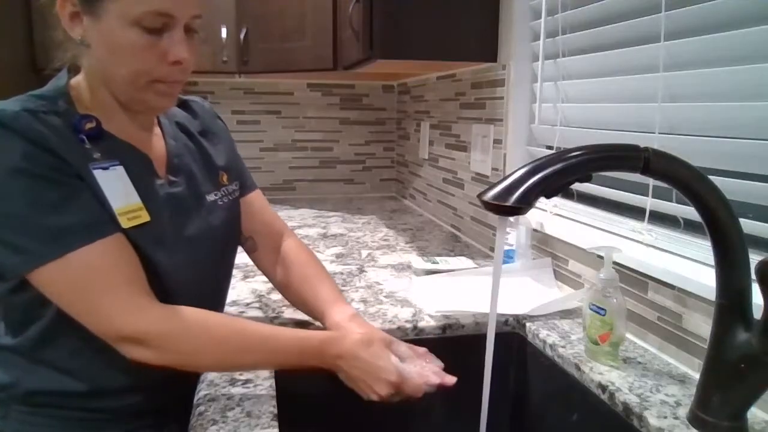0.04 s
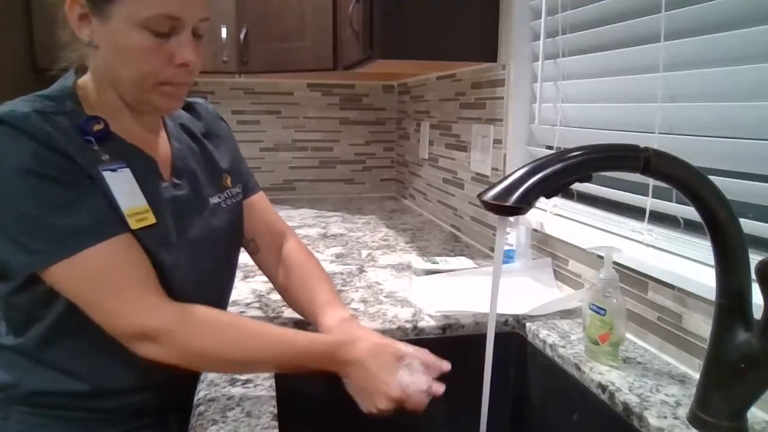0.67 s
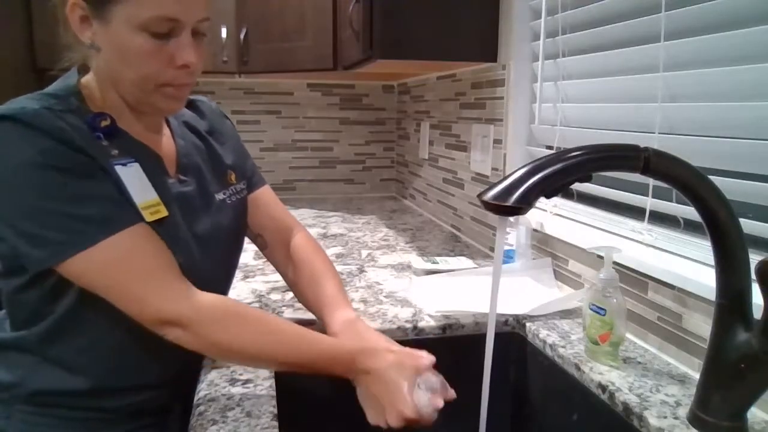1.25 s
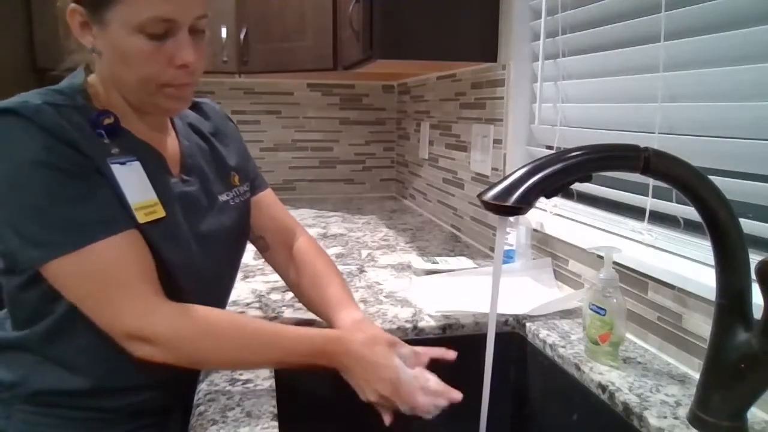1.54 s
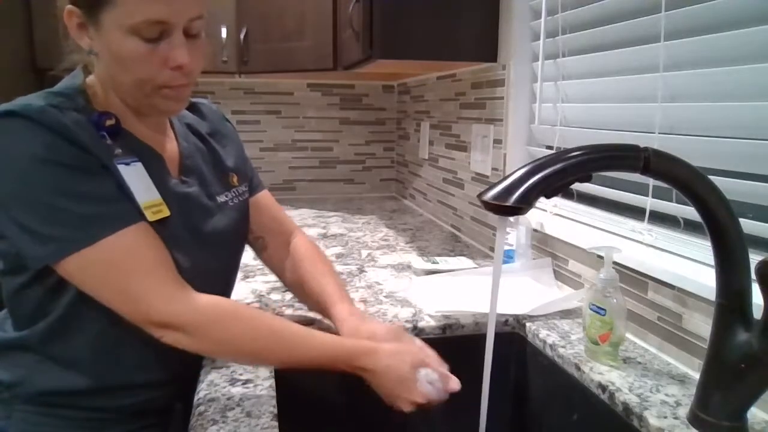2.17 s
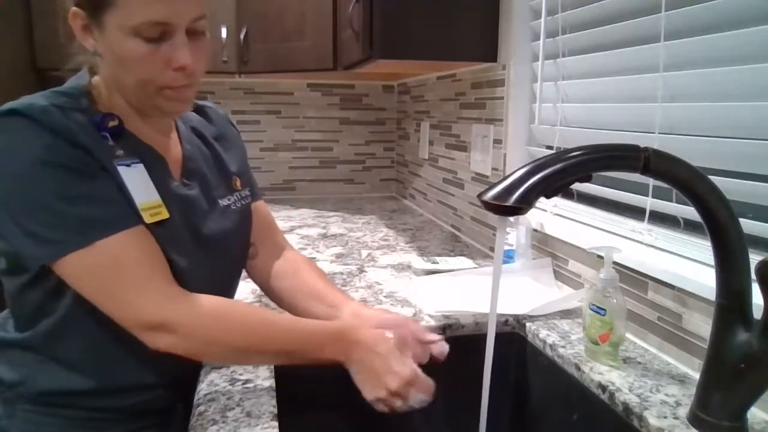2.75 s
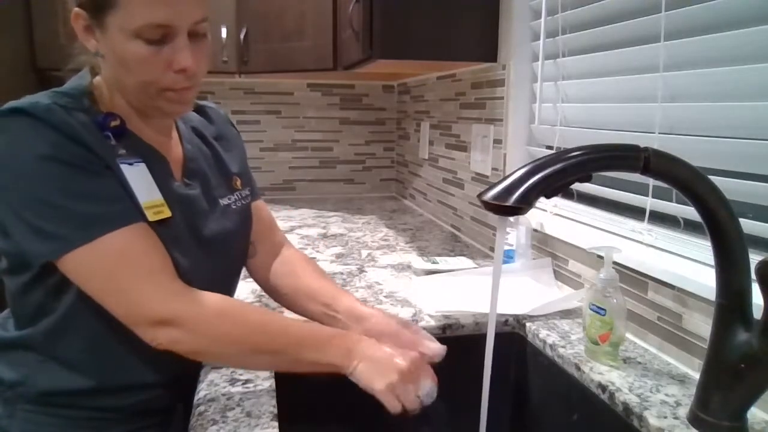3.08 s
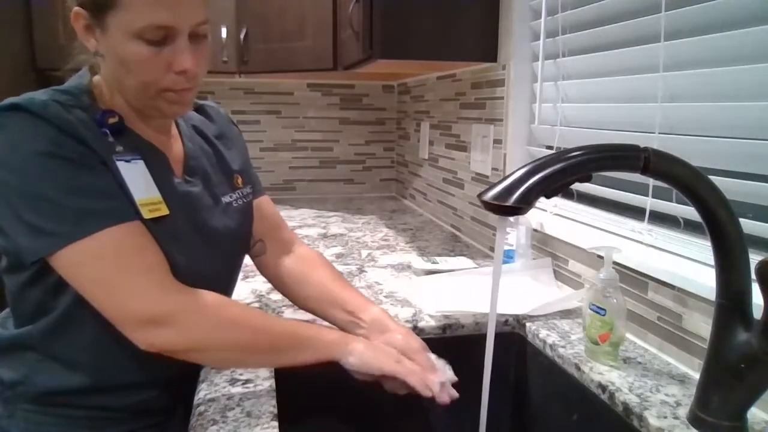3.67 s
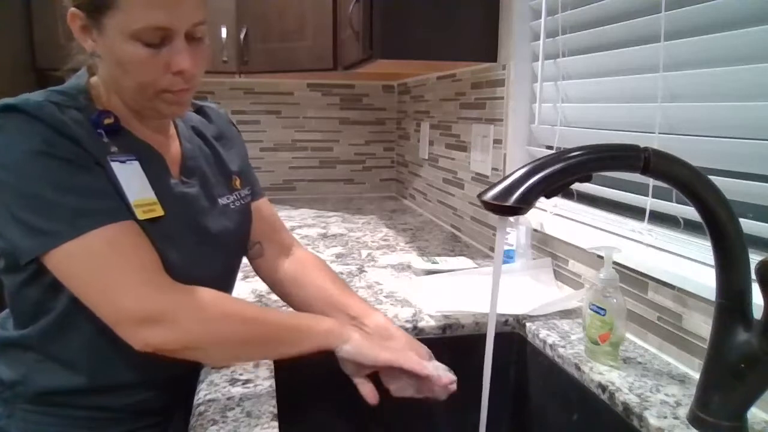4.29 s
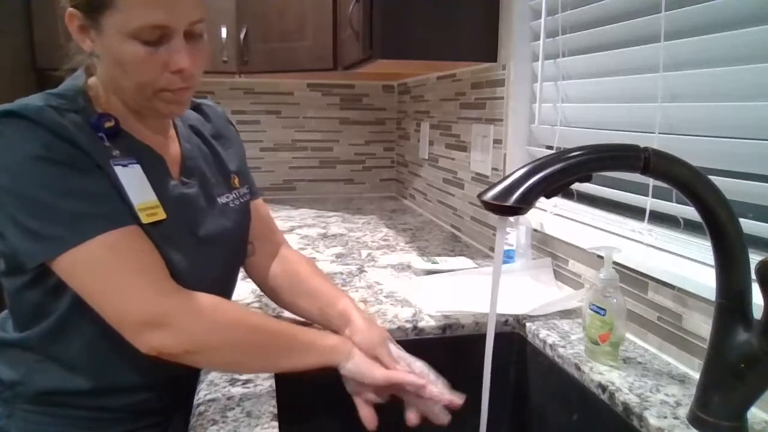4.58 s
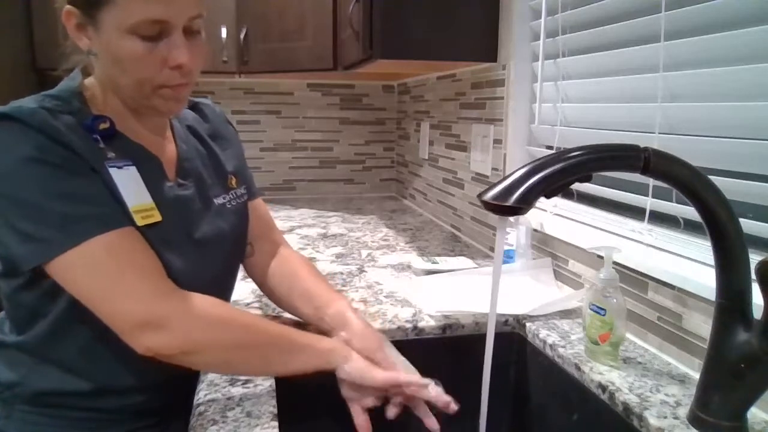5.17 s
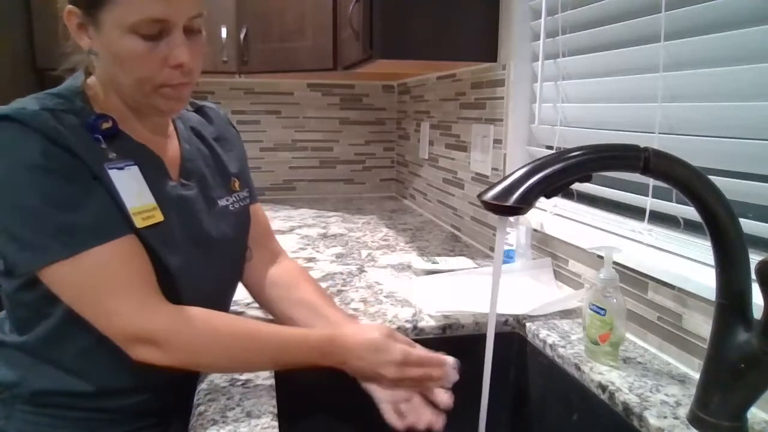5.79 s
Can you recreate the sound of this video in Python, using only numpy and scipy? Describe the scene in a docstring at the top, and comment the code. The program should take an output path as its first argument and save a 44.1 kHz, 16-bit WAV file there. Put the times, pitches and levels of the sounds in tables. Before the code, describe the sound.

From the first moment, soapy hands rub together close by, making a continuous, bright crackle of bursting foam. Short wet squelches come irregularly, several a second, mixed with sharp snaps of soap film, small pops and tiny high squeaks of trapped air. Crisp snaps stand out at the start and near 0.8 seconds. The squishing is busiest from about 2 to 3 seconds, with the strongest pop and snap around 2.6. Softer slippery slides follow just after 3 seconds, then another snap near 4, a cluster of squelches and pops around 4.5 to 4.8, and a last pop near 5.9. Underneath, for all six seconds and much quieter, a thin stream from a faucet patters into the sink, with soft low drumming on the basin and faint gurgles at the drain. The hard kitchen corner adds a brief ring and a short echo.

```python
"""Soapy hands rub together over a kitchen sink while a thin stream runs from the faucet.
Tiny foam bubbles burst and crackle, air pockets squelch, squeak and pop between the palms,
and soap films snap. The stream drums softly on the basin and gurgles at the drain.
The hands and the spray ring briefly in the hard corner of counter and tiles. The sound is mono."""
import sys
import numpy as np
from scipy import signal
from scipy.fft import rfft, irfft, next_fast_len
from scipy.io import wavfile
from scipy.ndimage import uniform_filter1d, map_coordinates

SR = 44100
rng = np.random.default_rng(int(sys.argv[2]) if len(sys.argv) > 2 else 0)


def unload_audio(sound):
    """Save the sound as a 16-bit wav file, at the path given as the first command line argument."""
    columns = np.transpose(np.atleast_2d(sound))
    # keep every value between -1 and 1, then stretch to whole-number steps
    steps = np.round(np.clip(columns, -1, 1) * 32767)
    wavfile.write(sys.argv[1], SR, steps.astype(np.int16))


N = 266319

# Levels in a table compare its rows; the function that plays them sets the final loudness.
# big air pockets squeezed out between the hands: start_s, length_s, level_db, pitch_hz, spread_octaves
AIR_POCKETS = [(0.012, 0.046, -43, 4501, 0.327), (0.305, 0.07674, -47, 4617, 0.4145),
               (0.38, 0.046, -43.5, 6499, 0.1481), (0.486, 0.03, -43, 6921, 0.052),
               (0.551, 0.06023, -46, 4670, 0.56285), (0.632, 0.04, -44, 7042, 0.1807),
               (0.727, 0.026, -40.5, 4823, 0.3767), (0.818, 0.01584, -31.5, 5959, 0.21166),
               (1.018, 0.02294, -45, 6095, 0.0439), (1.136, 0.03133, -44, 4551, 0.66),
               (1.232, 0.0405, -46.5, 3508, 0.3505), (1.299, 0.04623, -43.5, 3939, 0.2183),
               (1.397, 0.03402, -43.5, 4895, 0.57), (1.493, 0.02426, -37.5, 4861, 0.039),
               (1.614, 0.01157, -35.5, 7417, 0.045), (1.68, 0.034, -39, 5529, 0.2503),
               (1.719, 0.03098, -41, 4652, 0.4156), (1.807, 0.04213, -41, 6689, 0.2499),
               (1.842, 0.026695, -35, 4807, 0.4923), (1.933, 0.039, -44.5, 3812, 0.2182),
               (2.002, 0.02113, -43, 7164, 0.0789), (2.048, 0.014, -32.5, 4407, 0.1054),
               (2.121, 0.0285, -36.5, 6095, 0.1908), (2.371, 0.06287, -41, 5404, 0.31853),
               (2.454, 0.11953, -42, 4686, 0.1214), (2.51, 0.04525, -33, 4393, 0.3221),
               (2.572, 0.05582, -38.5, 5469, 0.533), (2.653, 0.02888, -34.5, 8039, 0.1037),
               (2.681, 0.03801, -44.5, 4274, 0.2152), (2.814, 0.026, -45.5, 4561, 0.386),
               (2.87, 0.0592, -41.5, 4151, 0.256), (2.995, 0.021, -39.5, 5582, 0.7),
               (3.105, 0.02269, -37, 7068, 0.1974), (3.245, 0.03818, -37.5, 6695, 0.65),
               (3.309, 0.0499, -42, 6353, 0.3632), (3.584, 0.03816, -42, 5285, 0.1685),
               (3.477, 0.04128, -51, 3233, 0.2561), (3.638, 0.0942, -44.5, 4985, 0.59),
               (3.897, 0.06506, -48.5, 3604, 0.3284), (3.954, 0.04677, -41, 4869, 0.46),
               (4.203, 0.03, -43.5, 3864, 0.31006), (4.237, 0.033, -36.5, 5210, 0.3756),
               (4.277, 0.02, -36.5, 6060, 0.2037), (4.378, 0.07, -49.5, 5270, 0.043),
               (4.427, 0.04529, -38.5, 5986, 0.3971), (4.547, 0.03946, -40, 6113, 0.3225),
               (4.602, 0.05, -38, 4425, 0.2061), (4.692, 0.0871, -39, 4706, 0.2201),
               (4.752, 0.02261, -34.5, 4291, 0.71), (4.815, 0.03528, -45.5, 4720, 0.1655),
               (4.857, 0.01606, -42.5, 4086, 0.3776), (4.932, 0.04562, -42, 4271, 0.5653),
               (5.027, 0.0667, -39, 5444, 0.074), (5.125, 0.01755, -41.5, 4708, 0.332),
               (5.17, 0.03136, -44.5, 5235, 0.102), (5.238, 0.02914, -37.5, 4323, 0.6234),
               (5.309, 0.027, -35.5, 6067, 0.25), (5.499, 0.04478, -37, 6341, 0.3826),
               (5.566, 0.01889, -43.5, 4560, 0.5624), (5.727, 0.027, -39, 5137, 0.1583),
               (5.831, 0.049, -38.5, 4655, 0.69), (5.904, 0.03634, -39, 3949, 0.5251)]
# soap films that snap: start_s, level_db
FILM_SNAPS = [(0.047, -19.5), (0.0653, -21.5), (0.087, -37), (.126, -27.5), (0.192, -24.5), (0.316, -24),
              (0.502, -24.5), (0.6571, -23), (0.8065, -24.5), (0.842, -16), (1.6208, -28.5),
              (2.0893, -22.5), (2.123, -19.5), (2.175, -22), (2.2314, -18.5), (2.587, -13), (2.6617, -22),
              (2.676, -24), (2.7493, -22), (2.7957, -26.5), (2.804, -27.5), (2.909, -20.5), (2.9983, -24),
              (3.246, -24.5), (3.5894, -23), (3.6929, -23), (3.9607, -16.5), (3.976, -22), (4.058, -29),
              (4.2763, -24.5), (4.4565, -21.5), (4.5628, -20.5), (4.7506, -20), (4.8652, -23), (5.24, -26),
              (5.336, -27.5), (5.417, -23.5), (5.526, -26), (5.696, -28)]
# tone of the foam and the spray, from low to high: frequency_hz, level_db
FOAM_TONE = [(150, -45), (700, -41.5), (1500, -16.5), (2300, -11.5), (3300, -18), (5000, -8), (6600, -5.5),
             (7700, -4), (9300, 0.5), (11500, 1.5), (14000, 3.5), (16000, -1.5)]


def amp(db):
    """Turn decibels into a number to multiply a sound by."""
    return 10 ** (np.asarray(db) / 20)


def unit(x):
    """Scale a sound to an average power of 1."""
    return x / np.sqrt(np.mean(x ** 2) + 1e-20)


def along(points, hz):
    """Read between (frequency_hz, value) points, giving each octave equal room."""
    frequencies, values = np.transpose(points)
    return np.interp(np.log(hz + 1), np.log(frequencies + 1), values)


def curve(rows):
    """Join (time_s, value) points with straight lines, one value per sample."""
    times, values = np.transpose(rows)
    return np.interp(np.arange(N) / SR, times, values)


def wobble(per_s):
    """A smooth random curve through per_s points a second."""
    return map_coordinates(rng.standard_normal(1024), [np.arange(N) * per_s / SR], mode='wrap')


def progress(n, length_s):
    """Climb from 0 to 1 in length_s, then stay there."""
    return np.minimum(np.arange(n) / (abs(length_s) * SR), 1)


def add(track, start_s, sound):
    """Mix a sound into the track."""
    start = int(np.clip(round(start_s * SR), 0, N - 1))
    track[start:start + len(sound)] += sound[:N - start]


def filtered(x, response):
    """Multiply each frequency in x by response(frequency)."""
    n = x.shape[-1]
    padded = next_fast_len(n + 4096)
    return irfft(rfft(x, padded) * response(np.fft.rfftfreq(padded, 1 / SR)), padded)[..., :n]


def coloured(x, tone):
    """Shape x with a (frequency_hz, level_db) table, at power 1."""
    return unit(filtered(x, lambda hz: amp(along(tone, hz))))


def low_cut(hz):
    """A filter response: small air pockets give off almost no low sound."""
    return (1 + (2200 / (hz + 1)) ** 8) ** -.5


def resonance(hz, pitch_hz, width_hz):
    """The response of something that rings at one pitch; narrower rings longer."""
    return 1j * hz * width_hz / (pitch_hz ** 2 - hz ** 2 + 1j * hz * width_hz)


def ringing(x, notes):
    """Let x ring several (pitch_hz, width_hz, level_db) notes at once."""
    return filtered(x, lambda f: sum(amp(db) * resonance(f, hz, width) for hz, width, db in notes))


def cavity(x, pitch_hz, width_hz):
    """Let x ring a small hollow whose pitch moves."""
    spin = np.exp(2j * np.pi * np.cumsum(pitch_hz) / SR)
    ring = signal.lfilter([1], [1, -np.exp(-np.pi * width_hz / SR)], x / spin)
    return unit((spin * ring).real)


def crackle(n, per_s, scatter_db, fade_s):
    """Tiny bursts of noise, random in timing and size."""
    hits = rng.random(n) < per_s / SR
    sizes = amp(scatter_db * np.clip(rng.standard_normal(n), -2, 2))
    power = signal.lfilter([1], [1, -np.exp(-2 / (fade_s * SR))], hits * sizes ** 2)
    return unit(np.sqrt(power + 1e-4) * rng.standard_normal(n))


def bubbles(n, per_s, pitch_hz, octaves, cycles, scatter_db):
    """Bubbles scattered around a pitch; each fades over its cycles and rises a little as it closes."""
    count = max(int(per_s * n / SR), 3)
    starts = ((np.arange(count) + rng.random(count)) * n / count).astype(int)
    detune, size = np.clip(rng.standard_normal((2, count, 1)), -2, 2)
    hz = np.minimum(np.broadcast_to(pitch_hz, n)[starts, None] * 2 ** (octaves * detune), SR / 2.8)
    samples = np.arange(min(int(5 * cycles * SR / np.mean(pitch_hz)) + 8, 6000))
    age = hz * samples / SR / cycles
    phase = 2 * np.pi * cycles * age * (1 + 0.003668 * age)
    rings = amp(scatter_db * size) * np.exp(-age) * np.sin(phase)
    return unit(np.bincount((starts[:, None] + samples).ravel(), rings.ravel(), n)[:n])


def stroke(length_s, rise_s, fade_s):
    """The loudness shape of one short sound: it rises, holds and fades."""
    t = np.arange(int((abs(length_s) + .05) * SR)) / SR
    shape = (1 - np.exp(-t / rise_s)) * np.exp(-np.maximum(t - 0.82652 * length_s, 0) / fade_s)
    return shape / np.sqrt(np.sum(shape ** 2) / (abs(length_s) * SR))


def swells(rows, rise_s, fade_s):
    """Power over time, with one rise, hold and fade for each row."""
    power, t = np.zeros(N), np.arange(SR // 2) / SR
    for start_s, length_s, level_db in rows:
        shape = (1 - np.exp(-t / rise_s)) * np.exp(-np.maximum(t - length_s, 0) / fade_s)
        add(power, start_s, (amp(level_db) * shape) ** 2)
    return power


def bubble_runs(rows, per_s, octaves, cycles):
    """For each row, a short run of bubbles near one pitch."""
    out = np.zeros(N)
    for start_s, length_s, level_db, pitch_hz in rows:
        swell = stroke(length_s, rise_s=.004, fade_s=.012)
        rings = bubbles(len(swell), per_s, pitch_hz, octaves, cycles, scatter_db=-2.5)
        add(out, start_s, amp(level_db) * swell * rings)
    return out


def foam_loudness():
    """Rubbing bursts foam all the time; big squeezes and snaps each burst some more."""
    # how hard the hands work the lather: time_s, level_db
    rubbing = [(0, -26.5), (.25, -39), (.7, -33), (1.15, -38), (1.4, -35), (1.9, -34.5), (2.35, -35),
               (2.65, -33.5), (2.95, -34), (3.45, -37), (4.2, -36), (4.9, -39), (5.7, -33.5), (6.04, -40)]
    steady = amp(curve(rubbing) + 3 * wobble(per_s=17)) ** 2
    squeezes = [(start_s, length_s, db + 0.5) for start_s, length_s, db, *_ in AIR_POCKETS]
    early_s = 0.002978  # the foam starts to burst just before the film parts
    flurries = [(start_s - early_s, early_s, db - 10.5) for start_s, db in FILM_SNAPS]
    squeezed = swells(squeezes, rise_s=0.0006, fade_s=0.0143)
    snapped = swells(flurries, rise_s=0.002483, fade_s=0.024545)
    return np.sqrt(steady + squeezed + snapped)


def lather():
    """Countless foam bubbles burst under the rubbing; larger ones tick and ring among them."""
    loudness = amp(-3.5) * foam_loudness()
    fizz = crackle(N, per_s=1900, scatter_db=-4, fade_s=0.00025)
    ticks = crackle(N, per_s=330, scatter_db=6.5, fade_s=0.004168)
    # each size of bubble crackles around its own pitch, at its own moments
    sizes = sum(ringing(crackle(N, per_s=220, scatter_db=11.5, fade_s=0.002919), [(hz, 2600, 0)])
                for hz in (3819.4, 7357, 10266, 11761, 16185))
    pings = bubbles(N, per_s=380, pitch_hz=7000, octaves=0.6, cycles=22, scatter_db=5.5)
    foam = amp(-12) * fizz + amp(-2.5) * ticks + unit(sizes) + amp(-5.5) * pings
    return loudness * coloured(foam, FOAM_TONE)


def hand_contact():
    """The rubbing gets quieter wherever the hands slow or turn."""
    # dips in the rubbing: middle_s, half_length_s, change_db
    pauses = [(0.22, 0.0317, -2), (0.685, 0.01212, -21.5), (0.787, 0.0109, -8), (0.974, 0.0832, -2),
              (1.206, 0.01724, -8), (1.471, 0.02666, -6), (1.572, 0.006496, -16), (1.781, 0.010426, -14.5),
              (1.887, 0.01925, -0.5), (2.329, 0.02545, -6.5), (2.959, 0.01556, -2), (4.898, 0.00895, -5),
              (5.488, 0.0142, -12), (5.657, 0.03635, -7.5), (5.792, 0.01217, -13)]
    t = np.arange(N) / SR
    return amp(sum(db * np.exp(-np.minimum(((t - middle_s) / half_s) ** 2, 20))
                   for middle_s, half_s, db in pauses))


def patter():
    """Steady spray and small bubbles where the stream lands."""
    drops = bubbles(N, per_s=900, pitch_hz=4514.1, octaves=0.45, cycles=27.64, scatter_db=8.5)
    hiss = coloured(crackle(N, per_s=11000, scatter_db=10.5, fade_s=0.00092), FOAM_TONE)
    return amp(-60.5) * drops + amp(-54.5) * hiss


def drumming():
    """Lumps in the stream keep the basin ringing and shake the cabinet below it."""
    # notes of the basin: pitch_hz, width_hz, level_db
    basin_notes = [(146.34, 10.213, 35.5), (204.13, 13.65, 18.5)]
    # moments when the stream drums harder: start_s, length_s, level_db
    surges = [(.02, 0.04375, -69), (.288, 0.02325, -68), (.845, 0.05125, -65), (.99, 0.03325, -64),
              (1.28, 0.06634, -68.5), (1.614, 0.04405, -62.5), (2.027, 0.02683, -66), (2.17, 0.1246, -70.5),
              (2.76, 0.02667, -68.5), (3.809, 0.02357, -65), (4.684, 0.10114, -60), (4.85, 0.04926, -62),
              (5.195, 0.07507, -65), (5.32, 0.169, -65.5), (5.599, 0.0353, -64.5)]
    # tone of the cabinet's rumble: frequency_hz, level_db
    cabinet_tone = [(20, -16.5), (60, -0.5), (105, -0.5), (140, -13.5), (300, -50.5)]
    steady = amp(-79.5 + 1.5 * wobble(per_s=7.8)) ** 2
    drum_db = 10 * np.log10(steady + swells(surges, rise_s=0.00714, fade_s=0.02103))
    lumps = crackle(N, per_s=900, scatter_db=3, fade_s=0.002092)
    ring = filtered(ringing(lumps, basin_notes), lambda hz: resonance(hz, 158.01, width_hz=82.5))
    # even out the ring so that drum_db sets its loudness
    ring /= np.sqrt(np.abs(uniform_filter1d(ring ** 2, size=4000)) + 1e-20)
    rumble_db = -88 + 0.3957 * (drum_db - np.mean(drum_db)) + 2.212 * wobble(per_s=12)
    rumble = coloured(rng.standard_normal(N), cabinet_tone)
    return amp(drum_db) * ring + amp(rumble_db) * rumble


def gurgling():
    """Water stirs the hollows of the drain, burbles and now and then gulps air."""
    # notes of the drain: pitch_hz, width_hz, level_db
    drain_notes = [(349.23, 16.145, -1.5), (406.4, 20.98, -4.5), (560, 30.34, -0.5), (891.95, 38.44, -5),
                   (1028.3, 50.76, -3.5), (1191.4, 14.15, 0), (1311.3, 16.71, -2)]
    # more or less gurgling as the basin fills and empties: time_s, change_db
    flow = [(0, 1.5), (.45, -2.5), (.9, 0.5), (1.9, 1), (2.7, 2), (3.4, 1), (4.3, -1.5), (4.7, 3), (5.3, 0),
            (5.7, -1.5), (6.04, -0.5)]
    # gulps of air: start_s, length_s, level_db, pitch_hz
    gulps = [(.19, 0.04275, -71, 348.4), (.61, .057, -64, 568), (.77, .03, -65, 530.2),
             (1.0, 0.11, -72.5, 555.5), (1.4, .04, -60, 1324), (1.72, 0.04892, -72.5, 560.3),
             (1.98, 0.05457, -69.5, 397.5), (2.18, 0.03451, -63, 501.6), (2.39, 0.068, -72, 385.2),
             (2.42, 0.2011, -79, 576.1), (2.86, .07, -69.5, 334.7), (4.07, 0.04132, -72, 343),
             (4.51, 0.04758, -69.5, 372.9), (4.53, 0.03414, -67, 576.9), (4.76, .08, -70.5, 566.6),
             (4.88, 0.039, -69.5, 577.3), (5.29, .045, -64, 589.4), (5.34, 0.06866, -67, 1206),
             (5.36, .07, -67, 581.8), (5.71, .05, -72, 350.8)]
    loudness = amp(curve(flow) + 3 * wobble(per_s=7.8))
    # two sets of hollows, each stirred at its own moments
    drain = sum(ringing(crackle(N, per_s=160, scatter_db=3, fade_s=0.0182), notes)
                for notes in (drain_notes[::2], drain_notes[1::2]))
    burble = bubbles(N, per_s=60, pitch_hz=400, octaves=.5, cycles=12, scatter_db=2)
    trickle = bubbles(N, per_s=80, pitch_hz=1050, octaves=.4, cycles=22, scatter_db=3)
    gurgle = amp(-71.5) * unit(drain) + amp(-82) * burble + amp(-79) * trickle
    return loudness * gurgle + bubble_runs(gulps, per_s=200, octaves=.04, cycles=18)


def splashing():
    """The stream splashes faintly on the sink floor."""
    # tone of the splashing: frequency_hz, level_db
    splash_tone = [(20, -12), (60, 5.5), (110, -3), (200, 13.5), (260, 1.5), (450, 7), (750, -2), (1500, 6),
                   (3000, 10.5), (6000, -41), (12000, -10.5), (16000, 17)]
    return amp(-58.5) * coloured(crackle(N, per_s=1600, scatter_db=-9.5, fade_s=0.002098), splash_tone)


def squeaks():
    """Air forced through a thin soap film keeps a small pocket ringing at two pitches."""
    # squeaks of trapped air: start_s, length_s, level_db, low_hz, high_hz, high_over_low_db
    trapped_air = [(0.009, 0.0321, -42.5, 3774, 7133, 0), (0.32, 0.02128, -46.5, 2921, 6414, 4),
                   (0.631, 0.0363, -50, 6512, 7052, -6.5), (1.163, 0.03703, -50.5, 2978, 6344, -10.5),
                   (1.246, 0.0389, -55.5, 2659, 6315, 5), (1.843, 0.02765, -47.5, 3579, 5816, -7),
                   (1.944, 0.02426, -45, 3751, 4607, -11), (2.224, 0.0191, -48.5, 3342, 5875, -1.5),
                   (2.681, 0.02213, -43.5, 3965, 5696, -2), (2.873, 0.02953, -43.5, 3914, 4330, 0.5),
                   (3.633, 0.0242, -47.5, 3020, 5439, 3), (3.681, 0.01935, -42.5, 4579, 5378, -4.5),
                   (3.71, 0.021, -49.5, 2978, 6538, 1.5), (3.988, 0.0546, -53.5, 4485, 5130, -0.5),
                   (4.957, 0.05164, -50.5, 2537, 5145, -6), (5.027, 0.06445, -51, 3734, 5489, 5.5),
                   (5.57, 0.02497, -55, 2972, 5803, 1.5), (5.725, 0.03325, -48, 4596, 4898, -7.5),
                   (5.849, 0.03303, -48.5, 2761, 5681, -2.5)]
    out = np.zeros(N)
    for start_s, length_s, level_db, low_hz, high_hz, high_over_low_db in trapped_air:
        swell = stroke(length_s, rise_s=0.0011, fade_s=0.00729)
        n = len(swell)
        bend = 2 ** (0.014 * rng.uniform(-0.75, 1) * (progress(n, length_s) - .5))
        film = crackle(n, per_s=1200, scatter_db=1, fade_s=0.001107)
        low, high = (unit(swell * cavity(film, hz * bend, width_hz=38.1)) for hz in (low_hz, high_hz))
        add(out, start_s, amp(level_db + 0.5) * np.std(swell) * (low + amp(high_over_low_db) * high))
    return out


def small_pockets():
    """Random rows like AIR_POCKETS for the faint squelches of sliding fingers."""
    # a typical small pocket: length_s, level_db, pitch_hz, spread_octaves
    typical = (0.0033, -56, 5004.5, 0.6223)
    length_s, level_db, pitch_hz, spread_octaves = typical
    per_s = 6
    draws = rng.uniform(-0.73, 1, (int(per_s * N / SR), 4))
    return [((k + .5 + later / 2) / per_s, length_s * 2 ** (longer / 2), level_db + 2 * louder,
             pitch_hz * 2 ** (0.3851 * higher), spread_octaves)
            for k, (later, longer, louder, higher) in enumerate(draws)]


def squelches():
    """Air tears through the wet film; its spray rings the pocket, and bubbles follow the pitch."""
    out = np.zeros(N)
    for start_s, length_s, level_db, pitch_hz, spread_octaves in AIR_POCKETS + small_pockets():
        squeeze = stroke(length_s, rise_s=0.00069, fade_s=0.009129)
        n = len(squeeze)
        width_hz = pitch_hz * np.clip(3.627 * spread_octaves, .2, 1.5)
        tearing = crackle(n, per_s=500, scatter_db=2.5, fade_s=0.002776)
        spray = unit(filtered(tearing, lambda hz: resonance(hz, pitch_hz, width_hz) ** 2))
        glide_octaves = 0.1381 * rng.uniform(-0.9495, 1)
        moving_hz = pitch_hz * 2 ** (glide_octaves * (progress(n, length_s) - .5))
        # gaps between the fingers make four new hollows around the pocket's pitch
        octaves = np.clip(0.72658 * spread_octaves, .1, .45)
        gaps = octaves * (np.linspace(-1, 1, num=4) + rng.uniform(-0.31195, 0.2618, size=4))
        hollows = unit(sum(cavity(spray, moving_hz * 2 ** gap, width_hz=132.5) for gap in gaps))
        rings = bubbles(n, per_s=420, pitch_hz=moving_hz, octaves=max(octaves, .2),
                        cycles=15, scatter_db=3.5)
        squelch = unit(spray + amp(-3.5) * hollows + amp(-6) * rings)
        add(out, start_s, amp(level_db - 0.5) * squeeze * squelch)
    return filtered(out, low_cut)


def palm_squishes():
    """Bubbles ring near the pitch of the hollow between cupped palms."""
    # hollow squishes: start_s, length_s, level_db, pitch_hz
    squishes = [(.03, 0.02427, -51.5, 3094), (.325, 0.03516, -54, 2914), (1.29, 0.0396, -52.5, 2888),
                (2.14, .025, -48.5, 2962), (2.225, 0.026, -54, 2813), (2.52, 0.03146, -47, 2788),
                (2.725, .035, -50.5, 2587), (3.635, 0.03039, -48.5, 2833), (3.712, 0.03582, -55, 2873),
                (4.747, 0.02695, -48.5, 2700), (4.936, .05, -48, 2413), (5.175, 0.01857, -53, 2839),
                (5.57, 0.02418, -60, 2823), (5.855, 0.03633, -48, 2758), (5.9, 0.0314, -49, 2682)]
    return amp(1.5) * bubble_runs(squishes, per_s=1100, octaves=0.17154, cycles=14.017)


def snaps():
    """A soap film parts with a sharp crack, then a brief spit whose tone depends on its size."""
    out, t = np.zeros(N), np.arange(SR // 40) / SR
    lead_samples = 64  # silence in front gives the tone filter room
    fade = np.exp(-t / .0016) + amp(-5) * np.exp(-t / .007)
    for start_s, level_db in FILM_SNAPS:
        film_hz = 10500 * np.exp(0.4128 * rng.standard_normal())
        crack = fade * rng.standard_normal(len(t))
        tick = filtered(crack, lambda hz: 0.1554 + resonance(hz, film_hz, width_hz=4900))
        add(out, start_s - lead_samples / SR, amp(level_db - 13.5) * brighten(tick, lead_samples))
    return filtered(out, low_cut)


def brighten(tick, lead_samples):
    """Put silence before a tick and give it the bright tone of a snapping film."""
    # tone of a snap: frequency_hz, level_db
    snap_tone = [(200, -52.5), (900, -42.5), (1800, -45), (3500, -7.5), (7000, 2), (10000, 12.5),
                 (13000, 6.5), (16000, -2)]
    return coloured(np.pad(tick, (lead_samples, 0)), snap_tone)


def slides():
    """Soapy skin slides on skin: fine crackle rings a changing wet gap and sheds bubbles."""
    # long soft squishes: start_s, length_s, level_db, first_hz, last_hz
    skin_slides = [(0.27, .04, -42.5, 3412, 5810), (2.014, 0.032, -46, 3587, 4266),
                   (2.357, .06, -41.5, 3613, 5265), (3.038, 0.12, -54.5, 3619, 3906),
                   (3.165, .125, -51.5, 4957, 4295), (3.311, 0.04, -50.5, 3517, 2829),
                   (3.395, 0.054, -60.5, 4648, 4183), (3.654, 0.061, -48, 4118, 4731),
                   (4.023, 0.074, -64, 4615, 4305), (4.12, .055, -49.5, 3606, 4001),
                   (5.037, .08, -64.5, 3553, 3890), (5.196, .04, -52, 3578, 4051),
                   (5.27, .05, -44.5, 4026, 3604), (5.354, 0.11, -51, 5914, 6759),
                   (5.953, 0.072, -55, 4176, 3568)]
    out = np.zeros(N)
    for start_s, length_s, level_db, first_hz, last_hz in skin_slides:
        swell = stroke(length_s, rise_s=0.002675, fade_s=0.00796)
        n = len(swell)
        moving_hz = first_hz * (last_hz / first_hz) ** progress(n, length_s)
        gap = cavity(crackle(n, per_s=3000, scatter_db=10.5, fade_s=0.0012), moving_hz, width_hz=96.8)
        rings = bubbles(n, per_s=880, pitch_hz=moving_hz, octaves=0.22872, cycles=14.7, scatter_db=4)
        add(out, start_s, amp(level_db - 2.5) * swell * unit(amp(4.5) * gap + rings))
    return filtered(out, low_cut)


def pops():
    """A pocket opens all at once and its air rings for a few milliseconds."""
    # sharp wet pops: start_s, peak_db, pitch_hz
    openings = [(.486, -32, 6654), (1.295, -25, 3879), (1.31, -27, 3439), (1.496, -24, 4670),
                (2.007, -22.5, 7250), (2.0487, -21.5, 4534), (2.5355, -15, 4482), (2.748, -27, 4700),
                (2.994, -33, 5095), (3.246, -27, 7400), (3.477, -30.5, 3293), (3.691, -40, 4612),
                (4.2754, -22, 5802), (4.564, -22.5, 5348), (4.6897, -23.5, 5705), (4.7485, -16, 3711),
                (5.027, -22.5, 5889), (5.1754, -25.5, 4968), (5.499, -26, 6750), (5.906, -19, 5423)]
    out, t = np.zeros(N), np.arange(SR // 30) / SR
    for start_s, peak_db, pitch_hz in openings:
        puff = rng.standard_normal(len(t)) * np.exp(-t / 0.001838)
        pop = filtered(puff, lambda hz: resonance(hz, pitch_hz, width_hz=3320) ** 2 * low_cut(hz))
        add(out, start_s, amp(peak_db) * pop / np.abs(pop).max())
    return out


def sucks():
    """A large, leaky hollow between the palms opens with a dull puff."""
    # the palms let go: start_s, length_s, level_db, pitch_hz
    releases = [(1.395, 0.0393, -61, 1104), (3.668, 0.01857, -58, 912.5)]
    out = np.zeros(N)
    for start_s, length_s, level_db, pitch_hz in releases:
        swell = stroke(length_s, rise_s=0.001925, fade_s=0.0098)
        air = rng.standard_normal(len(swell))
        puff = filtered(air, lambda hz: resonance(hz, pitch_hz, width_hz=2.056 * pitch_hz) ** 2)
        add(out, start_s, amp(level_db + 5) * swell * unit(puff))
    return out


def corner(x):
    """The hard corner rings at many pitches; each comes and goes as the hands move."""
    # notes of the corner: pitch_hz, level_db
    corner_notes = [(2445, -5), (2560, -13), (2697, 3.5), (2820, 3), (2960, 6), (3070, 1), (3383, 5),
                    (3525, 8), (3630, 2), (3735, 6.5), (3895, -2), (4078, 4.5), (4490, 1.5), (4585, 0),
                    (4840, -3), (5078, -2), (5203, 4.5), (5410, 4), (5827, 5.5), (5938, 0), (6067, -1.5),
                    (6248, 7.5), (6691, 6.5), (6785, 5.5), (7043, 0), (7252, -6), (8990, 2)]
    waver_db, wavers_per_s = 4.5, 6
    steps = np.arange(N) * wavers_per_s / SR
    out = np.zeros(N)
    for pitch_hz, level_db in corner_notes:
        waver = np.clip(rng.standard_normal(int(steps[-1]) + 2), -1.5, 1.5)
        loudness = np.interp(steps, np.arange(len(waver)), amp(level_db + waver_db * waver))
        out += signal.lfilter(*signal.iirpeak(pitch_hz, pitch_hz / 34, SR), x * loudness)
    return np.std(x) * unit(out)


def echo_tail(delay_s):
    """A wash of echoes in which each frequency dies at its own speed."""
    # time the kitchen takes to fade by 60 dB: frequency_hz, fade_s
    fade_times = [(200, 0.42), (3000, 0.20314), (8000, 0.10343), (15000, 0.1924)]
    hz, t, noise = signal.stft(rng.standard_normal(SR // 2), SR, nperseg=256)
    fade = amp(-60 * t / along(fade_times, hz)[:, None])
    tail = signal.istft(noise * fade, SR, nperseg=256)[1]
    return np.pad(tail / np.linalg.norm(tail), (int(delay_s * SR), 0))


def kitchen(x):
    """The direct sound and the corner's ring, then echoes that shift as the hands move."""
    near = amp(-5.5) * x + amp(-12.5) * corner(x)
    moments = np.linspace(0, N, num=12)
    room = np.zeros(N)
    for weights in np.eye(len(moments)):  # each set of echoes blends into the next
        echoes = amp(-7.5) * echo_tail(delay_s=.008)
        wall_delays = (rng.uniform(.0012, .012, size=7) * SR).astype(int)
        echoes[wall_delays] += amp(-19.5)
        blend = np.interp(np.arange(N), moments, weights)
        room += signal.oaconvolve(near * blend, echoes)[:N]
    return near + room


def scene():
    """Hands and spray echo in the kitchen, over the soft stream; both channels are the same."""
    palms = palm_squishes()
    rubbing = hand_contact() * (lather() + squelches())
    hands = rubbing + slides() + squeaks() + sucks() + palms + pops() + snaps()
    mono = kitchen(hands + patter()) + drumming() + gurgling() + splashing()
    return np.array([mono, mono])


def record(dry):
    """Cut away the very highest treble."""
    return filtered(dry, lambda hz: hz < 15750)


dry = scene()
out = record(dry)
unload_audio(out)
```